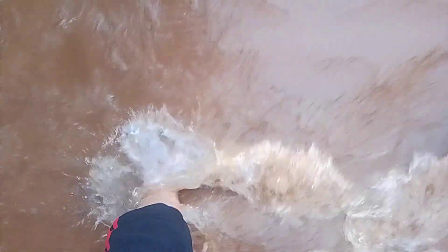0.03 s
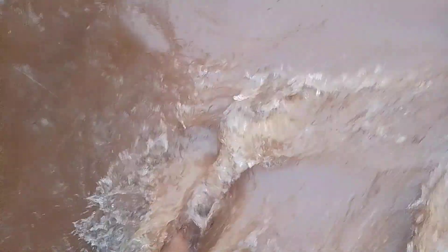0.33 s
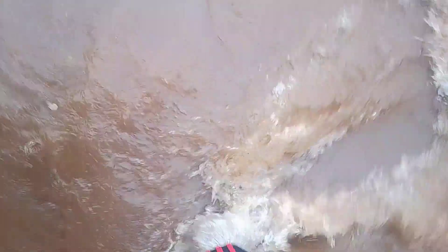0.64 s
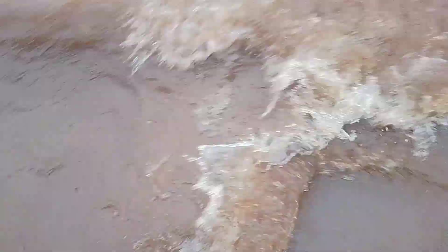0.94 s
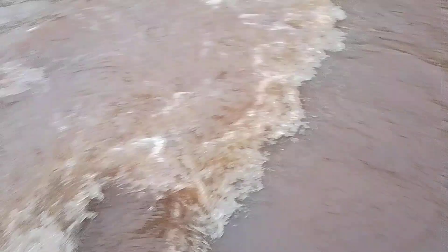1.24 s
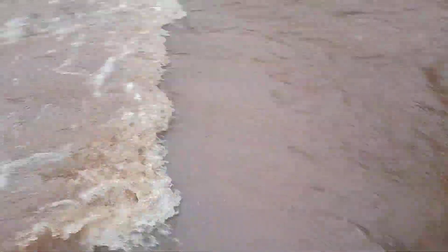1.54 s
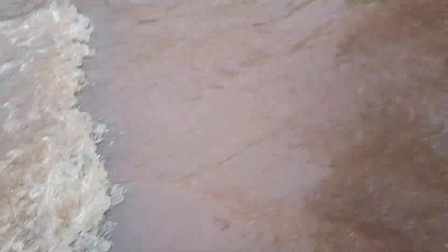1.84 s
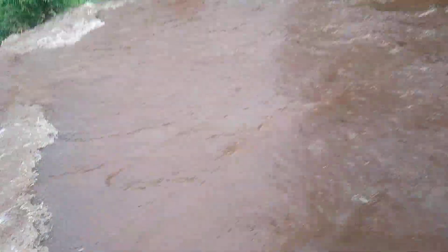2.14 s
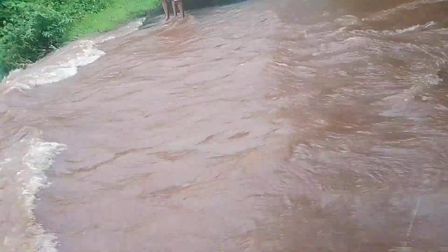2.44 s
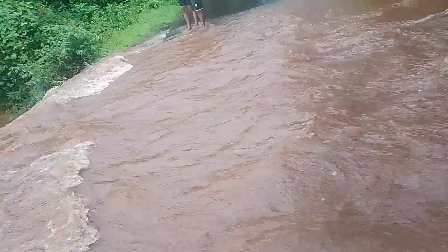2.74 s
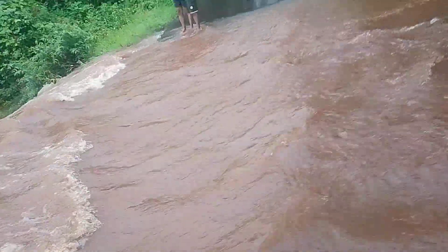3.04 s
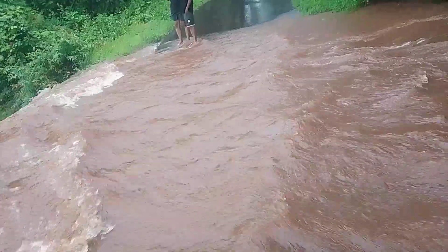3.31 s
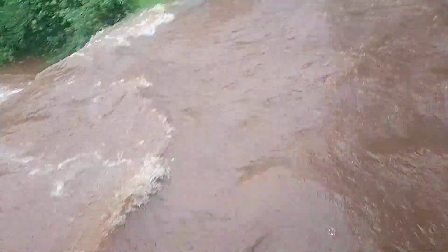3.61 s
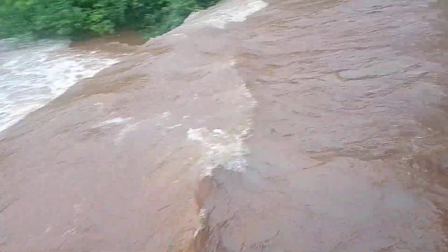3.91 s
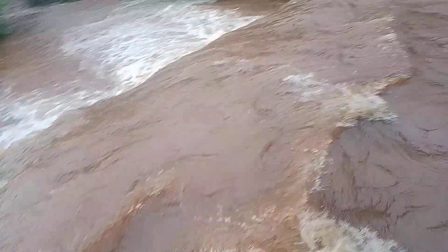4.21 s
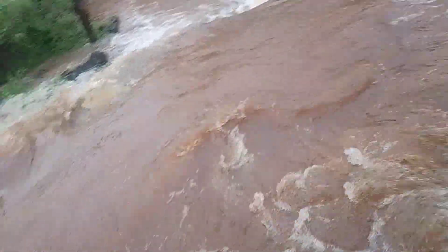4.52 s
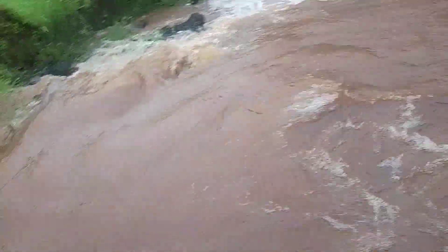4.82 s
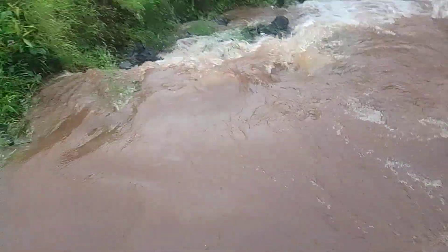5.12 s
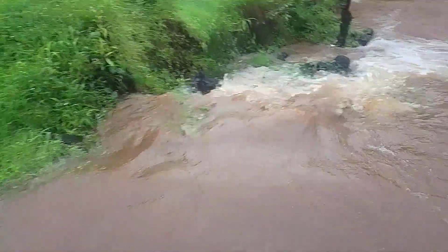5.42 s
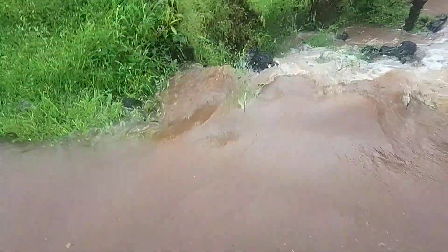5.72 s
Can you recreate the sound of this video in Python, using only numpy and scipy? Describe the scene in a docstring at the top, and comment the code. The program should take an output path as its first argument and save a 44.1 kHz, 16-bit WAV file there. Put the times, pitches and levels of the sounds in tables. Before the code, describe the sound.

A dull, steady rush of churning floodwater gurgles and hisses with foam, dotted with close slaps, splashes and a few plops.

```python
"""A bubbling rush of floodwater, with wavelets slapping right beside the microphone. The water pours over a
concrete road crossing; a dull microphone is held just above it by someone wading. Big air pockets gurgle in the
standing wave, swarms of bubbles ring in the churn, and the foam's hiss swells and fades; the treble brightens
abruptly at the end. Close by, water splashes and a few bubbles plop."""
import sys
import numpy as np
from scipy import signal
from scipy.fft import rfft, irfft, next_fast_len
from scipy.io import wavfile

SR = 44100
rng = np.random.default_rng(int(sys.argv[2]) if len(sys.argv) > 2 else 0)


def output_pcm(signal):
    """Save a mono or channel-first signal as 16-bit PCM at the path in sys.argv[1].

    Samples are clipped to [-1, 1] before scaling.
    """
    pcm = np.clip(np.atleast_2d(signal).T, -1, 1) * 32767
    wavfile.write(sys.argv[1], SR, np.round(pcm).astype(np.int16))


N = 262836
TIME = np.arange(N) / SR


def from_db(db):
    """Decibels to gain."""
    return 10 ** (np.asarray(db) / 20)


def rms_one(x):
    """Scale to unit power."""
    return x / np.sqrt(np.mean(x ** 2) + 1e-20)


def curve(rows, column=1):
    """One column of a timed table, sample by sample."""
    columns = np.transpose(rows)
    return np.interp(TIME, columns[0], columns[column])


def swell(middle_s, spread_s):
    """A bell-shaped rise and fall of height 1."""
    return np.exp(-.5 * ((TIME - middle_s) / spread_s) ** 2)


def impulses(rows):
    """One click for each row of time and level."""
    clicks = np.zeros(N)
    for s, db in rows:
        clicks[round(s * SR)] = from_db(db)
    return clicks


def drift(rate):
    """A random wander with spread 1, changing about rate times a second."""
    step, settle = 40, 2000
    pole = np.exp(-2 * np.pi * rate * step / SR)
    noise = rng.standard_normal(N // step + settle + 2)
    slow = signal.lfilter([1], [1, -2 * pole, pole * pole], noise)[settle:]
    return np.interp(np.arange(N) / step, np.arange(len(slow)), rms_one(slow))


def band(x, low_hz, high_hz, order=2):
    """Butterworth band-pass."""
    edges = [low_hz, min(high_hz, .45 * SR)]
    return signal.sosfilt(signal.butter(order, edges, "band", fs=SR, output="sos"), x)


def dip(x, db, hz, width_hz):
    """Turn down one narrow band."""
    inside = signal.lfilter(*signal.iirpeak(hz, hz / width_hz, fs=SR), x)
    return x - (1 - from_db(db)) * inside


def ring(clicks, hz, t60):
    """A unit click sets a sine of height 1 ringing."""
    decay, angle = from_db(-60 / (t60 * SR)), 2 * np.pi * hz / SR
    return signal.lfilter([0, np.sin(angle)], [1, -2 * decay * np.cos(angle), decay ** 2], clicks + 1e-18)


def colour(x, spectrum):
    """Causal (minimum-phase) filter through the points of a spectrum."""
    size = 2 * next_fast_len(N)
    hz, db = np.transpose(spectrum)
    bin_hz = np.arange(size // 2 + 1) * SR / size
    gain = from_db(np.interp(np.log(bin_hz + 1), np.log(hz), db))
    cepstrum = irfft(np.log(gain))
    cepstrum[1:size // 2] *= 2
    cepstrum[size // 2 + 1:] = 0
    return irfft(rfft(x, size) * np.exp(rfft(cepstrum)), size)[:N]


def swarm(low_hz, high_hz, per_s, cycles, clump_db, wash_db, size_spread_db=1.5, pitches=16):
    """Bubbles born in clumps, each ringing some cycles, over the wash of countless far ones; rms 1."""
    birth_chance = per_s / pitches / SR * from_db(clump_db * drift(14))
    near = np.zeros(N)
    for hz in np.geomspace(low_hz, high_hz, 2 * pitches + 1)[1::2]:
        born = np.flatnonzero(rng.random(N) < birth_chance)
        size_db = -size_spread_db * np.log(rng.random(N)[born] + .01)
        clicks = np.zeros(N)
        clicks[born] = from_db(size_db) * (-1.) ** born
        near += hz * ring(clicks, hz, cycles / hz)   # small bubbles die fast but snap harder
    near = band(near, low_hz / 1.51, high_hz * 1.37)
    far = band(rng.standard_normal(N), low_hz, high_hz, order=3)
    return rms_one(rms_one(near) + from_db(wash_db) * rms_one(far))


def rumble():
    """The moving mass of water rumbles under everything."""
    return from_db(-36.5) * rms_one(band(rng.standard_normal(N), 9.9, 170))


# fine spray over the crossing: t/s, level/dB
SPRAY_LEVEL = [(0, -67), (0.6, -69), (0.77, -66), (1.0, -69), (1.7, -66.3), (2.4, -64.8), (2.85, -67),
               (3.3, -66), (3.76, -63.5), (4.25, -67), (4.85, -70.5), (5.89, -73), (5.91, -66.5)]
# its thin, high tone: f/Hz, level/dB
SPRAY_SPECTRUM = [(3000, -28), (7000, 0.5), (9500, 2.5), (13500, 2.5), (15700, -2.5)]
# tiny sharp ticks, with one louder click just before the end: t/s, level/dB
SHARP_TICKS = [(0.658, -53), (1.111, -55), (2.837, -43), (3.237, -50), (3.671, -43), (4.005, -52),
               (5.818, -57), (5.903, -36)]


def spray(ticks_per_s=60, size_spread_db=3, tick_db=-11, mist_db=-50.5, mist_lingers=1.1):
    """A faint sizzle above the foam, swelling with each splash's mist, and a few sharp ticks."""
    mist = sum(from_db(db + mist_db) * swell(s, mist_lingers * spread) for s, db, spread, *_ in SHOWERS)
    sizes = from_db(-size_spread_db * np.log(rng.random(N) + .01))
    ticks = rms_one(sizes * (rng.random(N) < ticks_per_s / SR))
    sizzle = rms_one(colour(rng.standard_normal(N) + from_db(tick_db) * ticks, SPRAY_SPECTRUM))
    clicks = impulses(SHARP_TICKS)
    sharp = colour(clicks, SPRAY_SPECTRUM)
    sharp *= clicks.max() / np.abs(sharp).max()
    return np.hypot(from_db(curve(SPRAY_LEVEL)), mist) * sizzle + sharp


# air under the nearest wave: middle t/s, length/s, f/Hz, glide/(Hz/s), level/dB
AIR_HOLLOWS = [(0.548, 0.67, 489, 150, -43), (1.36, 0.21, 385, 39.5, -38), (1.653, 0.28, 337.3, -250, -42),
               (3.85, 0.42, 398.7, 200, -39), (4.25, 0.39, 468, -60, -36), (4.88, 0.18, 345.7, -100, -39.5),
               (5.218, 0.24, 300, -60.5, -40), (5.52, 0.28, 338.5, -60.5, -40.5)]


def hollows(width_hz=32):
    """Tumbling water keeps each trapped hollow ringing; its pitch slides with its size."""
    out, pole = np.zeros(N), np.exp(-np.pi * width_hz / SR)
    for s, length, hz, glide, db in AIR_HOLLOWS:
        tumbling = band(rng.standard_normal((2, N)), 1.0, 3 * width_hz, order=1)
        sway = signal.lfilter([1], [1, -pole], tumbling)
        phase = 2 * np.pi * np.cumsum(hz + glide * (TIME - s)) / SR
        ringing = sway[0] * np.cos(phase) + sway[1] * np.sin(phase)
        out += from_db(db) * swell(s, length / 2) * rms_one(ringing)
    return out


# the wave folds over and swallows air: t/s, level/dB, f/Hz
SWALLOWED_AIR = [(0.47, -37, 289), (0.767, -33.5, 382), (0.843, -31, 301), (0.967, -32, 325.6),
                 (1.272, -31.5, 379), (1.383, -33, 362.8), (1.477, -36, 347), (2.226, -36, 344),
                 (3.734, -31.5, 300.4), (3.873, -38, 334), (4.245, -34, 474), (4.322, -36, 448),
                 (4.434, -32, 390), (4.535, -35.5, 383), (4.62, -33, 431), (4.724, -31, 406.5),
                 (4.86, -32, 344.3), (4.94, -37, 338), (5.054, -37, 344), (5.225, -38, 347),
                 (5.5, -37, 335), (5.645, -34, 333), (5.915, -32.5, 291)]


def gulps(spread_s=0.017, rise_per_s=1.51, wobble_depth=0.0482, wobbles_per_s=70):
    """Each gulp is a small cluster of bubbles ringing near one pitch; it swells, wobbles and rises in pitch."""
    out, wobble = np.zeros(N), wobble_depth * drift(wobbles_per_s)
    for s, db, hz in SWALLOWED_AIR:
        span = np.abs(TIME - s) < 4 * spread_s
        pitch_hz = hz * (1 + rise_per_s * (TIME[span] - s) + wobble[span])
        phase = 2 * np.pi * (rng.random() + np.cumsum(pitch_hz) / SR)
        out[span] += from_db(db) * swell(s, spread_s)[span] * np.sqrt(2) * np.sin(phase)
    return out


# single large bubbles close by: t/s, level/dB, f/Hz, t60/s
LARGE_BUBBLES = [(0.824, -15.5, 846, 0.063), (2.346, -6.5, 670, 0.048), (5.254, -12, 815, 0.027)]


def plops(rise_per_s=7, attack_s=0.0028):
    """A large bubble rings and glides upward as it nears the surface."""
    out = np.zeros(N)
    for s, db, hz, t60 in LARGE_BUBBLES:
        age = np.clip(TIME - s, 0, 2 * t60)
        envelope = from_db(db - 60 * age / t60) * (1 - np.exp(-age / attack_s))
        out += envelope * np.sin(2 * np.pi * hz * age * (1 + rise_per_s * age / 2))
    return out


# splashes close by: t/s, level/dB, spread/s, centre f/Hz, ratio of band edge to centre
SHOWERS = [(0.331, -26, 0.044, 3900, 1.15), (0.477, -19, 0.0035, 1800, 1.26),
           (0.738, -23.5, 0.02, 3980, 1.2), (0.84, -26, 0.014, 900, 1.7), (0.855, -14, 0.0014, 3000, 1.5),
           (0.86, -20.5, 0.021, 3500, 1.4), (0.873, -18, 0.005, 2000, 1.4), (0.96, -31, 0.1, 3800, 1.09),
           (1.077, -21, 0.0071, 1440, 1.4), (1.272, -21, .004, 5200, 1.3), (2.337, -23.5, .005, 1400, 2.1),
           (2.37, -28, .02, 3900, 1.25), (3.77, -20.5, 0.012, 3100, 1.35), (4.557, -24, 0.013, 1090, 1.7),
           (4.997, -27, 0.0067, 2100, 1)]


def splashes(drops_per_s=16000):
    """Thrown water falls back as a brief, dense shower of like-sized drops."""
    out = np.zeros(N)
    for s, db, spread, hz, ratio in SHOWERS:
        drops = rng.choice([-1, 1], N) * (rng.random(N) < drops_per_s / SR)
        ratio = max(ratio, 1.05)
        out += from_db(db) * swell(s, spread) * rms_one(band(drops, hz / ratio, hz * ratio))
    return out


# wavelets right beside the microphone: t/s, level/dB
WAVELETS = [(0.079, -5), (0.191, -5.5), (0.481, -12), (0.614, -10), (0.725, -9.5), (0.734, -8),
            (0.867, -12), (1.267, -7), (1.379, -5.5), (2.333, -6), (2.966, -7), (3.618, -13), (4.874, -7.5)]


def slaps():
    """A wavelet closing on the surface gives one short, heavily damped pressure kick."""
    clicks = impulses(WAVELETS)
    kicks = band(clicks, low_hz=330, high_hz=2400)
    return kicks * clicks.max() / np.abs(kicks).max()


# the finest bubbles, hissing on the surface: t/s, level/dB
FIZZ_LEVEL = [(0, -27.5), (0.95, -29.5), (1.6, -26), (2.36, -24.5), (2.8, -26), (3.3, -24.5), (3.76, -24),
              (4.3, -25), (4.85, -27.5), (5.4, -31), (5.88, -34.5), (5.93, -28)]
# the foam's hiss swells and fades; the treble brightens abruptly at the end: t/s, level/dB before scaling
FOAM_LEVEL = [(0, -3.5), (0.45, -1), (1.15, -2), (1.7, 2), (2.36, 4.5), (2.8, -2), (3.3, -1.2), (3.76, 5),
              (4.25, 1.7), (4.85, -5.5), (5.45, -3), (5.87, -13), (5.93, -2)]


def white_water(foam_db=-25, foam_follows=0.39):
    """Tiny bubbles ring high as fizz and foam, each swelling and fading on its own curve."""
    fizz = swarm(4660, 7440, per_s=1200, cycles=17, clump_db=4, wash_db=1.5, pitches=8)
    foam = swarm(1886, 4620, per_s=1800, cycles=17.4, clump_db=3.5, wash_db=2)
    return from_db(curve(FIZZ_LEVEL)) * fizz + from_db(foam_db + foam_follows * curve(FOAM_LEVEL)) * foam


# small bubbles in the flow over the concrete: t/s, level/dB
BABBLE_LEVEL = [(0, -27.5), (0.85, -27.5), (1.6, -28.5), (2.4, -27), (2.85, -30), (3.8, -27), (5.2, -29),
                (5.96, -32)]
# mid-sized bubbles in the churn: t/s, level/dB
CHURN_LEVEL = [(0, -31), (0.8, -31), (1.15, -33), (1.8, -32), (2.2, -30), (2.6, -31.5), (3.3, -31.5),
               (3.7, -29.5), (4.55, -32.5), (4.8, -36.5), (5.4, -32), (5.96, -35)]
# air pockets in the standing wave: t/s, level/dB
GURGLE_LEVEL = [(0, -33), (0.85, -33.5), (1.15, -34), (1.5, -34.5), (2.8, -37.5), (3.75, -34.5),
                (4.5, -34.5), (5.15, -33.5), (5.96, -35.5)]


def torrent(surge_db=-0.3, surges_per_s=20):
    """Air trapped in the flood rings as three sizes of bubble, the bigger the lower."""
    babble = swarm(938, 1945, per_s=900, cycles=32, clump_db=3, wash_db=3)
    churn = swarm(455, 910, per_s=600, cycles=12.7, clump_db=1, wash_db=4.5, size_spread_db=4.5)
    gurgle = swarm(195, 468, per_s=700, cycles=15.4, clump_db=1, wash_db=1.5, size_spread_db=0.5)
    heave_db = surge_db * drift(surges_per_s)
    return (from_db(curve(BABBLE_LEVEL)) * babble
            + from_db(curve(CHURN_LEVEL)) * churn
            + from_db(curve(GURGLE_LEVEL) + heave_db) * gurgle)


# dull tone of the water at the microphone: f/Hz, level/dB
WATER_TONE = [(22, -38), (50, -20.5), (120, -6), (190, -4), (250, 5), (340, 7), (600, 1), (1850, -0.5),
              (2700, -5), (4000, -17.5), (4800, -25), (5800, -30.5), (7500, -46.5), (10000, -73.5)]
# the microphone turning above the water: t/s, level/dB of its dip near 2 kHz, surface echo strength (0-1)
MIC_AIM = [(0, -5, 0), (1.2, -8, 0.11), (1.9, -4, 0), (3.6, -2, 0), (4.4, -4, 0.1), (4.8, -10.5, 0.15),
           (5.96, -8, 0.32)]


def scene(echo_s=0.00114, echo_cut_hz=1800):
    """The water in the open air, with one dull echo off the smooth sheet below the microphone."""
    water = rumble() + hollows() + gulps() + plops() + splashes() + slaps() + white_water() + torrent()
    dull = signal.sosfiltfilt(signal.butter(1, echo_cut_hz, fs=SR, output="sos"), water)
    echo = curve(MIC_AIM, column=2) * np.interp(TIME - echo_s, TIME, dull)
    return (colour(water + echo, WATER_TONE) + spray())[None]


def record(dry, cutoff_hz=15750):
    """The microphone has a steady notch in the bass and a dip that depends on its aim; the top is cut."""
    heard = dip(dry, db=-22, hz=160.6, width_hz=81)
    heard = dip(heard, db=curve(MIC_AIM), hz=2195, width_hz=174)
    return signal.sosfilt(signal.ellip(10, .1, 80, cutoff_hz, fs=SR, output="sos"), heard)


dry = scene()
out = record(dry)
output_pcm(out)
```